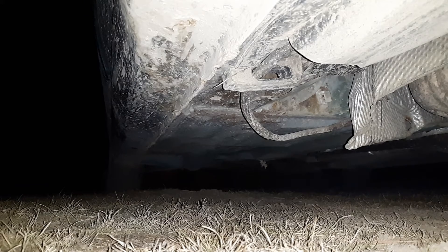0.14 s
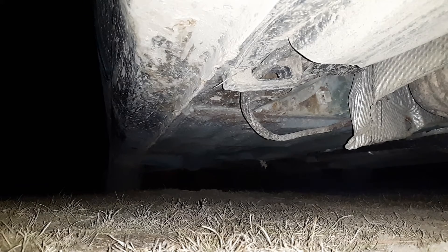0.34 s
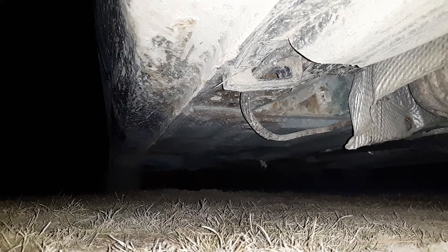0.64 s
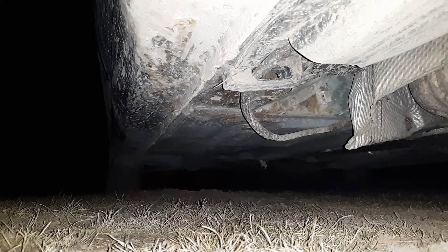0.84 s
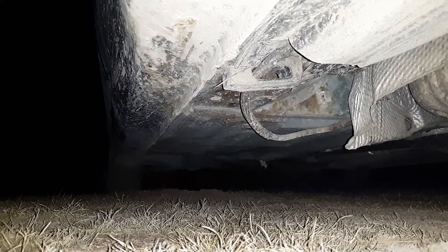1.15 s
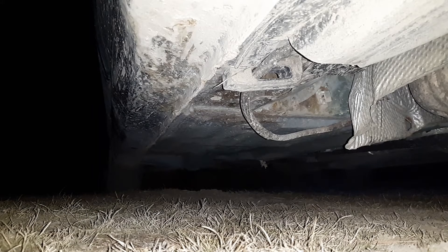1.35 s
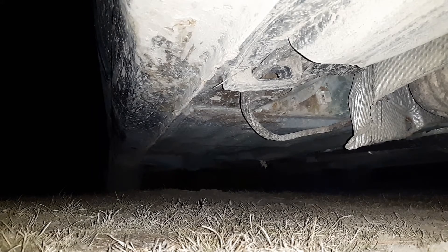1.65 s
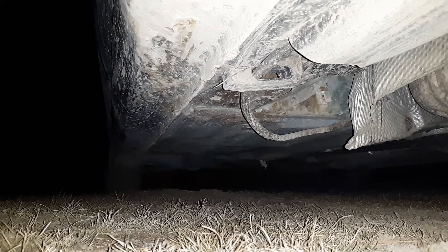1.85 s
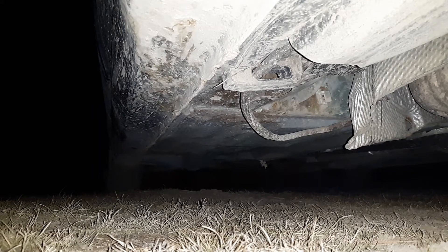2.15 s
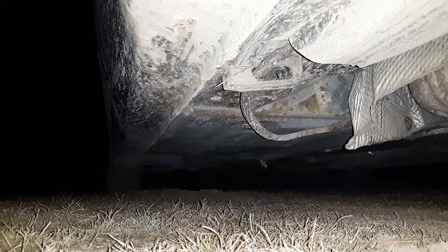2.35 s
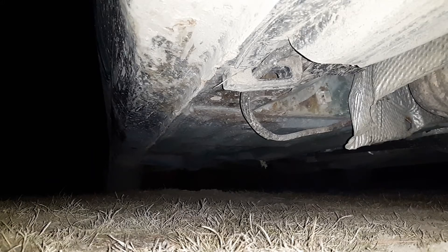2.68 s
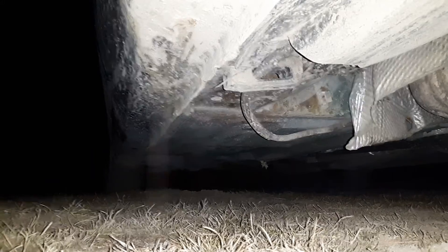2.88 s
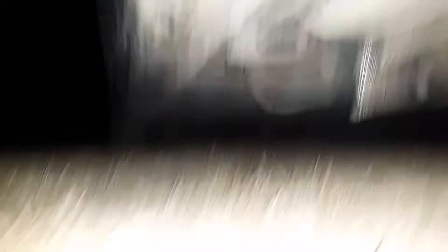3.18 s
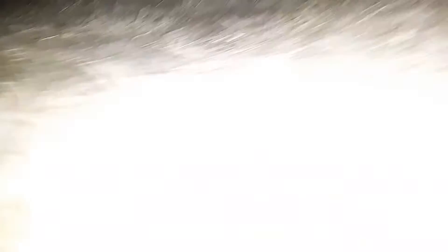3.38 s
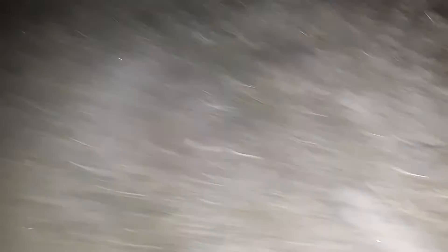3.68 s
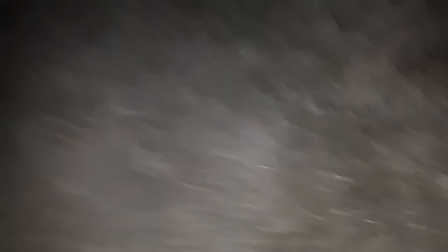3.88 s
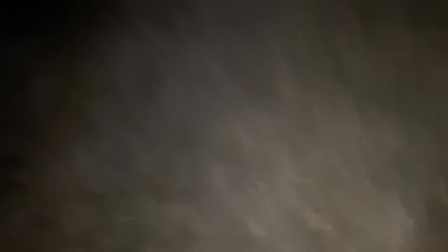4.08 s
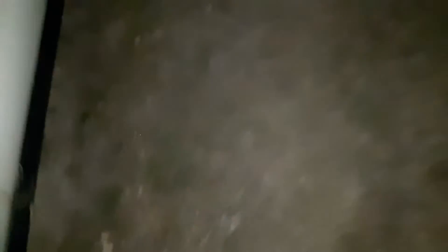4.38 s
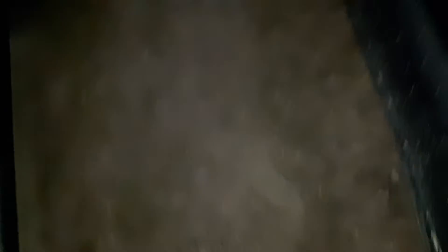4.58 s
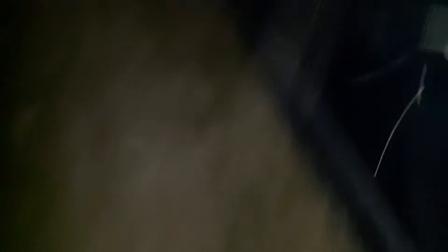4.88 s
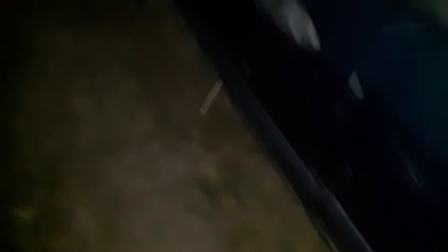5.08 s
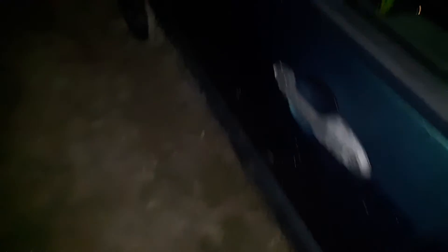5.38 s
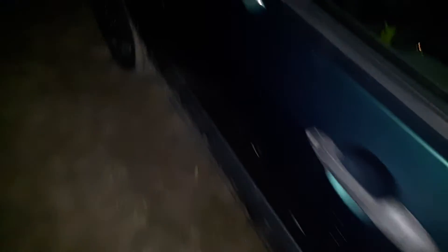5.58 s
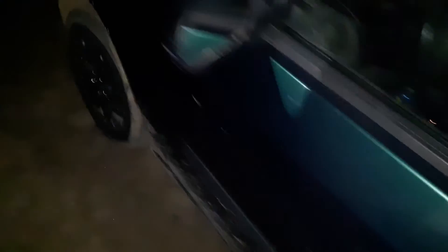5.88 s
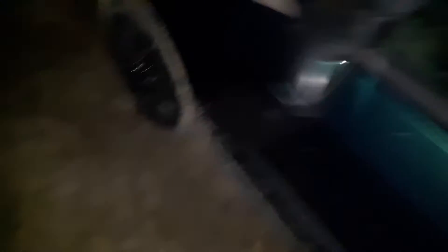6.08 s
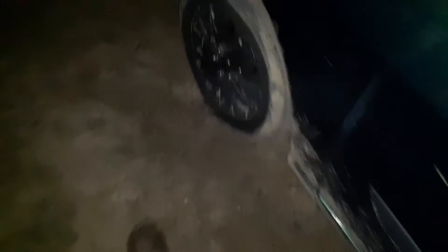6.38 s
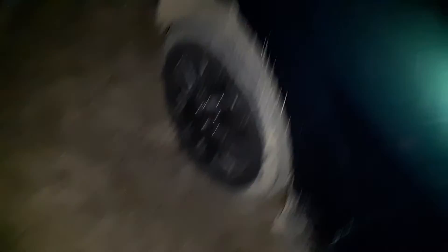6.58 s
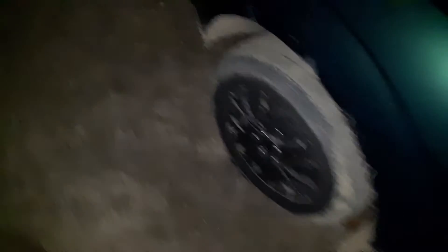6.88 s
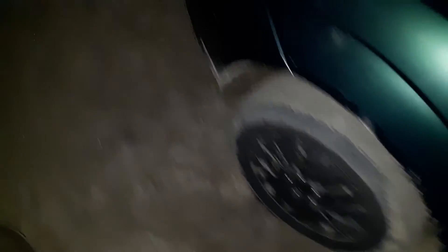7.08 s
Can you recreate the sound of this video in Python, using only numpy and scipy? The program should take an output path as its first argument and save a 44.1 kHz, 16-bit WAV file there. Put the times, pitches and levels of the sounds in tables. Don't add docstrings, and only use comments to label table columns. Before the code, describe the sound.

A handheld phone hears an open-pipe six-cylinder idle outdoors, steady at first, low and fluttering, with spitting leaks and belt whine. Handling clicks and grass brushes interrupt it midway. The sound drops for over a second as it is shielded, then swells at the car's side with a harsh loose-metal rattle, and finishes hissier by the wheel.

```python
import sys
import numpy as np
from scipy import signal
from scipy.fft import rfft, irfft, next_fast_len
from scipy.io import wavfile
from scipy.ndimage import uniform_filter1d

SR = 44100
rng = np.random.default_rng(int(sys.argv[2]) if len(sys.argv) > 2 else 0)


def output_pcm(signal):
    pcm = np.clip(np.atleast_2d(signal).T, -1, 1) * 32767
    wavfile.write(sys.argv[1], SR, np.round(pcm).astype(np.int16))


def voltage_ratio(level):
    return 10 ** (np.asarray(level, float) / 20)


N = 319284
TIME = np.arange(N) / SR


def unit(x):
    return x / np.sqrt(np.mean(x ** 2) + 1e-20)


def curves(rows, at):
    s, *cols = np.transpose(rows)
    return [np.interp(at, s, c) for c in cols]


def filtered(x, response):
    m = next_fast_len(N + SR // 4)
    return irfft(rfft(x, m) * response(np.fft.rfftfreq(m, 1 / SR)), m)[..., :N]


def along(points, hz):
    f, v = np.transpose(points)
    return np.interp(np.log(hz + 1), np.log(f + 1), v)


def mode(f, hz, width):
    return 1j * f * width / (hz * hz - f * f + 1j * f * width)


def panned(x, db):
    return x * np.array([voltage_ratio(db / 2), voltage_ratio(-db / 2)]).reshape(2, -1)


# (frequency [Hz], likeness [-1 to 1])
ALIKE = [(60, 0.99), (150, 0.99), (380, 0.96), (950, 0.52), (2380, 0.46), (5980, -0.05), (15000, 0.02)]


def rush(spectrum):
    size = next_fast_len(N)
    hz = np.fft.rfftfreq(size, 1 / SR)
    turn = np.arccos(np.clip(along(ALIKE, hz), -1, 1)) / 2
    white = rng.standard_normal((2, len(hz))) + 1j * rng.standard_normal((2, len(hz)))
    shaped = white * voltage_ratio(along(spectrum, hz)) * [np.cos(turn), np.sin(turn)]
    mid, side = irfft(shaped, size)[:, :N]
    return unit(np.array([mid + side, mid - side]))


# (time [s], place [0-6], travel time from the pipe [ms])
WALK = [(0, 0, 5.16), (3.5, 0, 5.16), (4, 1, 4.5), (4.35, 2, 5.1), (5.1, 2, 4.8), (5.5, 3, 4.9),
        (5.83, 3, 3.7), (5.93, 4, 1.45), (6.5, 4, 1.5), (6.8, 4.6, 1.8), (7, 5, 3.3), (7.24, 6, 3.1)]


def here(rows):
    place = curves(WALK, TIME)[0]
    return [np.interp(place, range(len(rows)), c) for c in np.transpose(rows)]


# (time [s], firing rate [1/s])
SPEED = [(0.0, 41.27), (0.28, 41.32), (0.73, 39.78), (1.35, 40.88), (1.83, 40.04), (2.31, 40.14),
         (2.82, 39.64), (3.3, 39.76), (3.68, 40.18), (4.4, 39.58), (4.93, 39.76), (5.41, 39.03),
         (6.03, 40.26), (6.43, 40.2), (6.82, 39.42), (7.24, 39.38)]


def firings():
    start = .3035
    count = start + np.cumsum(curves(SPEED, TIME)[0]) / SR
    number = np.arange(0, int(count[-1]) + 1)
    moment = np.interp(number, np.r_[0, count], np.r_[-start / SPEED[0][1], TIME])
    return count, number, moment, rng.standard_normal((len(number), 18))


def train(moment, size):
    return np.bincount(np.clip(np.round(moment * SR).astype(int), 0, N), size, N + 1)[:N]


def puffs(moment, size_db, rise, fall):
    t = np.arange(SR // 20) / SR
    puff = np.exp(-t / fall) * (1 - np.exp(-t / rise))
    return np.abs(signal.fftconvolve(train(moment, voltage_ratio(size_db)), puff)[:N])


# (frequency [Hz], width [Hz], second bank share [ratio],
# then strength at each of the seven places [ratio])
PIPE = [(30.0, 41.1, 1.06, 0.074, 0.146, 0.12, 0.129, 0.06, 0.09, 0.05),
        (76.6, 24.7, 0.95, -0.079, -0.2, -0.15, -0.13, -0.135, -0.147, -0.253),
        (125.5, 15.0, 0.96, -0.114, -0.25, -0.139, -0.039, -0.105, 0.0, -0.088),
        (167.5, 23.7, 0.67, -0.301, -0.43, -0.764, -0.787, -0.63, -0.621, -0.484),
        (190.4, 30.0, 0.73, -0.241, -0.1, 0.429, 0.418, 0.69, 0.61, 0.591),
        (248.7, 15.0, 0.28, 0.165, 0.1, 0.112, 0.329, -0.12, -0.066, -0.357),
        (262.7, 15.0, 2.5, 0.116, 0.1, 0.0, 0.0, -0.055, -0.057, -0.032),
        (332.3, 16.2, 1.52, 0.088, 0.068, 0.012, 0.02, -0.019, -0.052, -0.035),
        (359.5, 15.0, 0.17, 0.278, 0.14, 0.07, 0.05, -0.03, -0.095, -0.169),
        (383.3, 15.0, 1.4, -0.128, 0.02, -0.04, -0.059, 0.005, 0.072, 0.144)]
CYLINDERS = [0.57, 0.52, 0.17, 0.4, 0.55, 1]
# (frequency [Hz], level [dB per Hz])
GAS = [(30, -36.5), (60, -22), (150, 1.5), (250, 0), (380, 4.5), (450, -29.5), (700, -69)]
# (time [s], open pipe [dB], engine bay [dB])
HEARD = [(0, -12.5, -39), (1.6, -12.5, -39.5), (3.34, -11.5, -37.5), (3.57, -14, -38), (3.79, -20, -38.5),
         (4.07, -24, -41.5), (4.4, -27, -45), (4.9, -28, -49.5), (5.24, -27.5, -52.5), (5.36, -21.5, -42),
         (5.55, -16, -38.5), (6.07, -11.5, -33), (6.37, -11.5, -28.5), (6.59, -10.5, -32),
         (6.92, -13, -31.5), (7.24, -16.5, -27.5)]
# (pipe [dB], rasp [dB], hiss [dB])
FACING = [(-5, -2, -7), (-5.5, -5, -4.5), (-1.26, -7, -2.5), (1.4, -4, -5.5), (1.3, -5.5, -1),
          (-2.5, 1.5, -0.6), (-2.2, 2, 0)]
# (rasp over the pipe [dB], turbulence over the ringing [dB])
MIX = [(-14, -16.5), (-11.5, -13), (-15.5, -14.5), (-13, -25.5), (-13, -24.5), (-15, -14), (-17, -16)]


def exhaust(count, number, moment, luck):
    place, travel_ms = curves(WALK, moment)
    second = number % 2
    arrival = moment + (travel_ms - .44 * second) / 1000
    size = voltage_ratio(np.take(CYLINDERS, number % 6) + 0.2 * luck[:, 1])
    ring = 0
    for k, (hz, width, share, *strength) in enumerate(PIPE):
        blow = size * voltage_ratio(.5 * luck[:, 3 + k]) * np.interp(place, range(7), strength)
        blow = blow * np.where(second, share, 1)
        ring = ring + filtered(train(arrival + .00006 * luck[:, 0], blow), lambda f: mode(f, hz, width))
    slug = lambda f: (1j * f / (1j * f + 60)) ** 2 / (1 + (f / 420) ** 10)
    flow = unit(1.4 + puffs(arrival, 2 * luck[:, 2], rise=0.00099, fall=0.019))
    turbulence = voltage_ratio(here(MIX)[1]) * rush(GAS) * flow
    pipe_db = curves(HEARD, TIME)[0]
    return panned(voltage_ratio(pipe_db) * (unit(filtered(ring, slug)) + turbulence), here(FACING)[0])


def nearness():
    place = curves(WALK, TIME)[0]
    return np.clip(place / 2, 0, 1), np.clip(place - 4, 0, 1)


def blend(under, side, front):
    beside, wheel = nearness()
    near = np.sqrt(1 - beside) * rush(under)
    return near + np.sqrt(beside - wheel) * rush(side) + np.sqrt(wheel) * rush(front)


def swell(steady, moment, fall, size_db):
    return unit(steady + puffs(moment, size_db, rise=.002, fall=fall))


# (frequency [Hz], level [dB per Hz])
RASP_NEAR = [(260, -42), (440, -11), (479, -11.5), (604, -2), (733, -15.5), (799, -10.5), (863, -19),
             (947, -10), (1040, -16.5), (1120, -9.5), (1290, -13.5), (1770, -12), (2310, -19.5),
             (2490, -14), (2800, -26), (3640, -56), (6160, -120)]
RASP_SIDE = [(260, -42), (440, -13), (573, 0), (648, -6), (1020, -10), (1100, -4.5), (1580, -3.5),
             (1860, -5.5), (2800, -14), (3640, -41), (6160, -120)]
RASP_WHEEL = [(260, -42), (440, -14), (568, 4), (728, -21), (780, -3.5), (1030, -15), (1130, -0.5),
              (2800, -12), (3640, -31), (6160, -120)]


def rasp(moment, luck):
    steady = .6 + .5 * nearness()[1]
    return blend(RASP_NEAR, RASP_SIDE, RASP_WHEEL) * swell(steady, moment + .001, .009, 1.5 * luck[:, 14])


# (frequency [Hz], level [dB per Hz])
HISS_NEAR = [(1350, -29.5), (2300, -29), (2900, -7.5), (3360, -8.5), (4750, -14.5), (6550, -8),
             (7540, -20.5), (13100, -33), (14900, -41), (16100, -48), (16500, -71.5)]
HISS_SIDE = [(1350, -11), (2300, -14.5), (2900, -14.5), (3870, -12), (4560, -19), (6610, -10.5),
             (7660, -22.5), (9730, -24.5), (15100, -50), (16100, -48), (16500, -82)]
HISS_WHEEL = [(1350, -2), (2300, -6), (5240, -12), (6390, -10.5), (7790, -25.5), (12000, -34.5),
              (14800, -49), (16100, -55), (16500, -84)]


def hiss(number, moment, luck):
    steady = .45 + .7 * nearness()[1]
    size_db = 1.2 * luck[:, 15] + 2 * (number % 2) - 1
    return blend(HISS_NEAR, HISS_SIDE, HISS_WHEEL) * swell(steady, moment + .0015, .009, size_db)


# (frequency [Hz], level [dB per Hz])
LEAK = [(2700, -40), (3100, -5), (3300, 0), (3550, -6), (4000, -40)]


def leak(moment, luck):
    spit = swell(.02, moment + .001, .004, 3 * luck[:, 16])
    return voltage_ratio(-6) * (1 - nearness()[0]) * rush(LEAK) * spit


# (multiple of the firing rate [ratio], under the car [dB], beside it [dB])
WHINES = [(10, -24, -12), (15, -2, -14), (20, -17, -30), (28.7, -15, -30), (36.4, -15, -32),
          (44.5, -15, -32)]
# (frequency [Hz], under the car [dB], beside it [dB])
PUMP = [(549.2, -24, -9), (1098.4, -10, -13), (2196.8, -21, -20), (3295, -29, -34)]


def whines(count):
    beside = nearness()[0]
    drift = lambda: .5 * unit(uniform_filter1d(rng.standard_normal(N), size=SR // 10))
    tones = np.zeros(N)
    for multiple, under_db, beside_db in WHINES:
        level = voltage_ratio(under_db + (beside_db - under_db) * beside)
        tones += level * np.sin(2 * np.pi * multiple * count + 0.57 * drift())
    for hz, under_db, beside_db in PUMP:
        level = voltage_ratio(under_db + (beside_db - under_db) * beside)
        tones += level * np.sin(2 * np.pi * hz * TIME + 0.31 * drift())
    return tones


# (time [s], frequency [Hz], usual peak [dB])
SHIELD = [(0, 1370, -44), (3.3, 1334, -37.5), (3.9, 1320, -38), (4.3, 1590, -46), (5.1, 1610, -42),
          (5.7, 1310, -43), (6.2, 1463, -17.5), (6.6, 1260, -24), (6.85, 1220, -50)]
# (time [s], peak [dB], frequency [Hz])
PINGS = [(3.748, -24, 1290), (3.8982, -25, 1330), (4.503, -32, 1550), (4.604, -35, 1590),
         (4.803, -32, 1600), (4.8565, -32, 1580), (4.8824, -30, 1600), (4.9063, -31, 1530),
         (5.4162, -26, 1480), (5.4613, -25, 1530), (5.8667, -18.5, 1460), (5.967, -14.5, 1380),
         (5.9938, -13, 1430), (6.0155, -13.5, 1360), (6.0647, -15.5, 1460), (6.0897, -18, 1440),
         (6.1148, -12, 1420), (6.14, -18, 1370), (6.1875, -18, 1380), (6.213, -15, 1470),
         (6.2646, -13.5, 1360), (6.288, -16, 1520), (6.313, -8, 1420), (6.366, -13, 1250),
         (6.4404, -14.5, 1290), (6.4644, -15, 1290), (6.4865, -20, 1370), (6.615, -12.5, 1210)]


def shield(moment, luck):
    hz, usual_db = curves(SHIELD, moment)
    late_s, scatter_db, detune = .0055, 3, .04
    usual = np.c_[moment + late_s, usual_db + scatter_db * luck[:, 17], hz * (1 + detune * luck[:, 13])]
    apart = np.abs(usual[:, :1] - np.transpose(PINGS)[0]).min(axis=1) > .012
    ring, t = np.zeros(N + SR), np.arange(SR // 40) / SR
    rise_s, fall_s = .002, .0045
    shape = np.exp(-t / fall_s) * (1 - np.exp(-t / rise_s))
    for s, db, pitch in [*usual[apart & (moment > 0)], *PINGS]:
        note = np.sin(2 * np.pi * pitch * t) + 0.1 * np.sin(2 * np.pi * 1.55 * pitch * t)
        ring[round(s * SR):][:len(t)] += voltage_ratio(db + 2.5) * shape * note
    return ring[:N]


def patchy(x):
    z = signal.stft(x, nperseg=256)[2]
    field = uniform_filter1d(rng.standard_normal(z.shape[1:]), 3, axis=0)
    field = uniform_filter1d(field, 5, axis=1)
    colour = unit(voltage_ratio(2 * unit(field)))
    return signal.istft(z * colour, nperseg=256)[1][:, :N]


def bay(count, number, moment, luck):
    pipe_db, hiss_db = curves(HEARD, TIME)
    rasp_db = pipe_db + here(MIX)[0]
    _, rasp_side_db, hiss_side_db = here(FACING)
    gas = panned(voltage_ratio(rasp_db - 5.0) * rasp(moment, luck), rasp_side_db)
    jets = hiss(number, moment, luck) + leak(moment, luck)
    gas = gas + panned(voltage_ratio(hiss_db - 2.0) * jets, hiss_side_db)
    tones = voltage_ratio(rasp_db - 4.5) * whines(count) + shield(moment, luck)
    return patchy(gas) + panned(tones, rasp_side_db)


# (frequency [Hz], level [dB per Hz])
HUSH = [(300, -20.5), (1500, -13), (3000, -1.5), (6500, -0.5), (8000, -25.5), (12000, -29.5), (16500, -36)]


def steady_hush():
    return voltage_ratio(-55.5) * rush(HUSH)


# (frequency [Hz], level [dB per Hz])
GRASS = [(1180, -30), (2000, -8), (2770, 1.5), (3310, 4), (6640, 6.5), (7580, -2.5), (15100, -9.5),
         (16100, -30), (16500, -46)]
# (middle [s], half length [s], level [dB], left minus right [dB], bright share [0-1])
RUSTLES = [(3.287, 0.035, -34.5, -6, 0.9), (3.36, 0.089, -36.5, -13, 1), (3.439, 0.012, -39, -12, 1),
           (3.5, .03, -45, -7, 1), (4.427, 0.0082, -40.5, -12, 0.2), (4.476, 0.028, -45, -10, 0),
           (4.553, 0.015, -43, -11, .2), (4.79, 0.0074, -45, -11, 1), (5.017, 0.027, -46, 14, 0.9),
           (5.375, 0.035, -48.5, 11, 0.3), (5.946, 0.011, -34, 7.5, 0.2), (5.964, 0.006, -32.5, 35, 0),
           (5.936, .03, -49, 22, 0.2), (6.688, 0.11, -34.5, -8, 0.3), (6.796, 0.042, -40, 17, 1),
           (6.884, 0.07, -34, 4, 0.1)]


def rustles():
    grains = unit(uniform_filter1d(voltage_ratio(1.7 * rng.standard_normal((2, N))), size=40))
    bright = grains * rush(GRASS)
    dull = filtered(bright, lambda f: 1 / (1 + (f / 8500) ** 4))
    out = np.zeros((2, N))
    for middle, half, db, side_db, share in RUSTLES:
        near = slice(round((middle - 2 * half) * SR), round((middle + 2 * half) * SR))
        brush = voltage_ratio(db) * np.exp(-((TIME[near] - middle) / half) ** 2)
        noise = dull[:, near] + np.clip(share, 0, 1) * (bright - dull)[:, near]
        out[:, near] += panned(brush, side_db) * noise
    return out


# (time [s], peak [dB], left minus right [dB])
TICKS = [(3.4127, -8, 42.5), (3.4471, -2, -20), (4.127, -10, 54), (4.415, -23, -6), (4.4574, -14, -17),
         (4.885, -23, 19), (4.931, -16, -13), (5.9509, -9, 36), (5.965, -16, 6)]
# (frequency [Hz], width [Hz], level [dB])
CASE = [
    (5200, 3100, 3.5),
    (7270, 3700, 0),
    (10840, 1200, -5.5),
    (150, 230, 6.5),
]


def ticks():
    s, db, side_db = np.transpose(TICKS)
    blows = panned(np.ones(len(s)), side_db) * voltage_ratio(db - 0.5)
    knocks = np.array([train(s + .001, b) for b in blows])

    def case(f):
        ring = sum((-1) ** k * voltage_ratio(g) * mode(f, hz, width) for k, (hz, width, g) in enumerate(CASE))
        return ring / (1 + 1j * f / 12000) ** 2
    return filtered(knocks, case)


def scene():
    engine = firings()
    return exhaust(*engine) + bay(*engine) + steady_hush() + rustles() + ticks()


def top_cut(x):
    return signal.sosfilt(signal.butter(12, 16640, fs=SR, output="sos"), x)


def record(dry):
    flat = dry / (1 + np.abs(dry) ** 12) ** (1 / 12)
    mix = filtered(flat, lambda hz: (hz < 16600) / (1 + (hz / 15600) ** 30))
    return top_cut(mix)


dry = scene()
out = record(dry)
output_pcm(out)
```